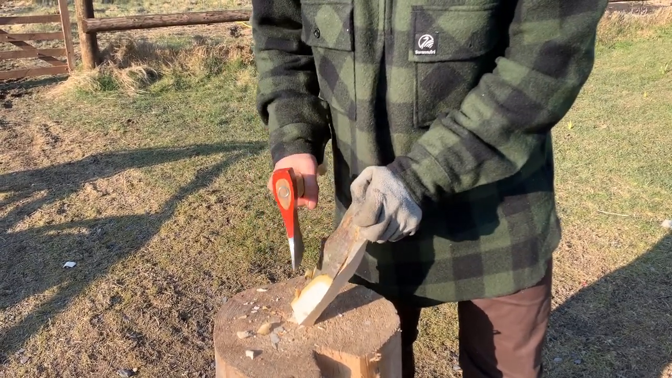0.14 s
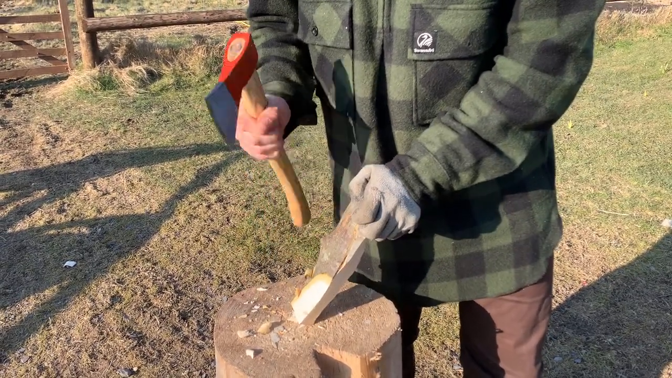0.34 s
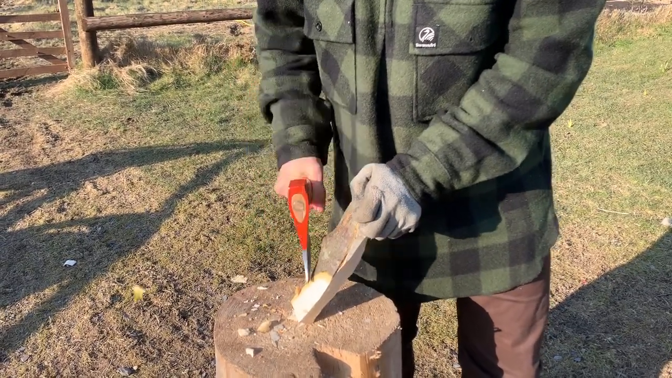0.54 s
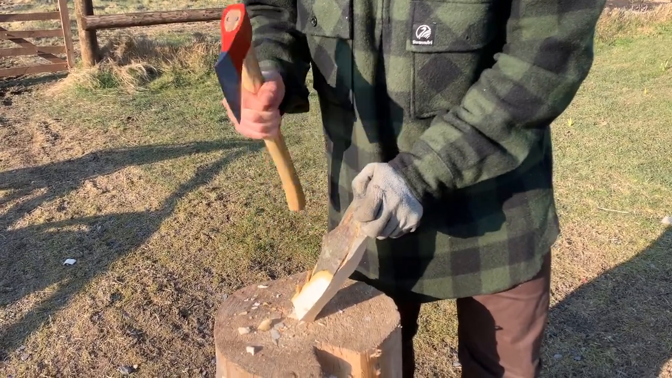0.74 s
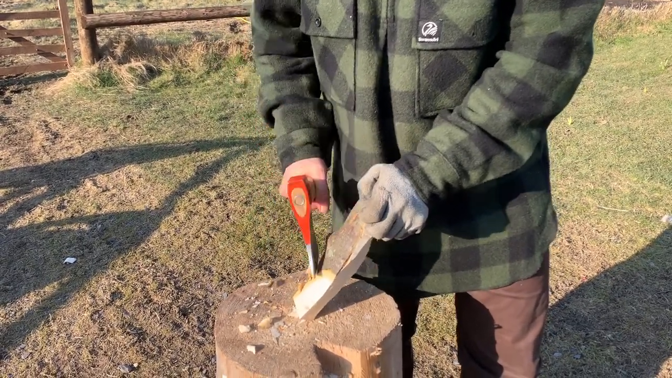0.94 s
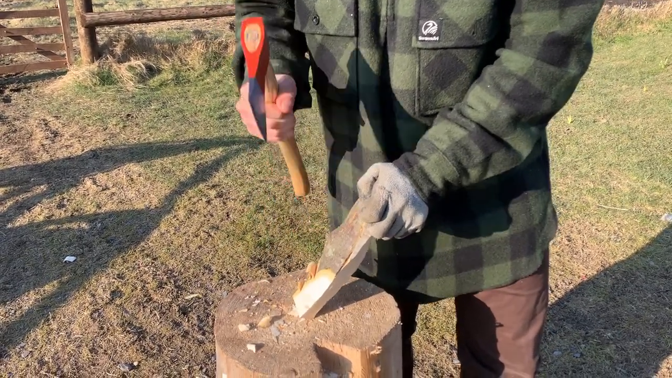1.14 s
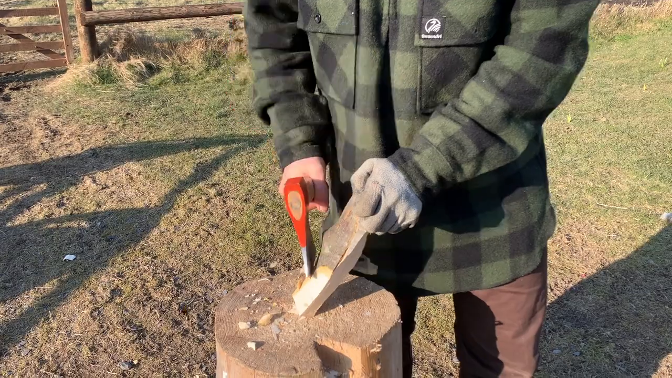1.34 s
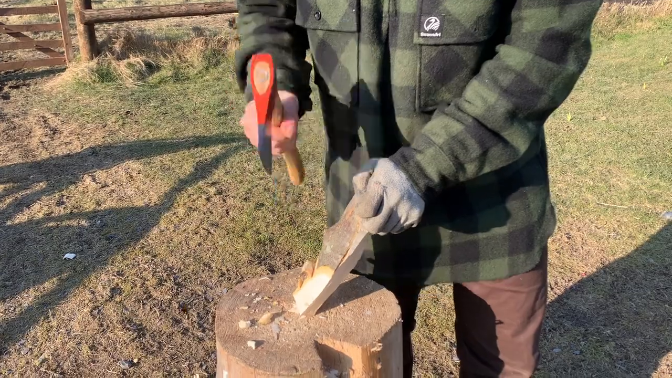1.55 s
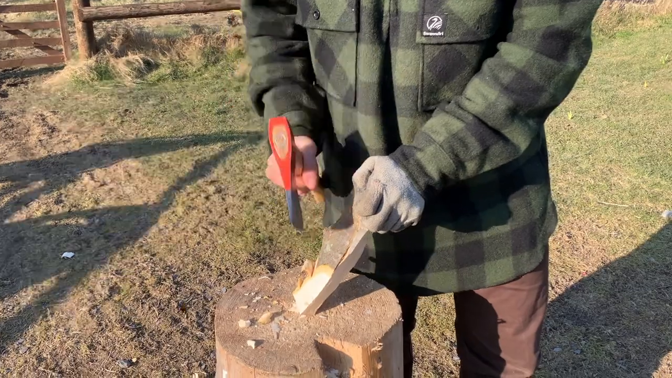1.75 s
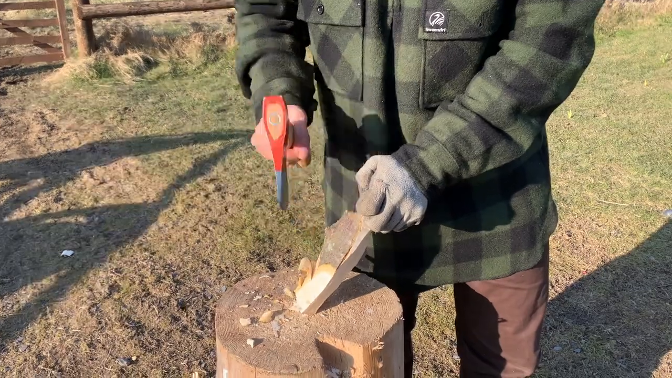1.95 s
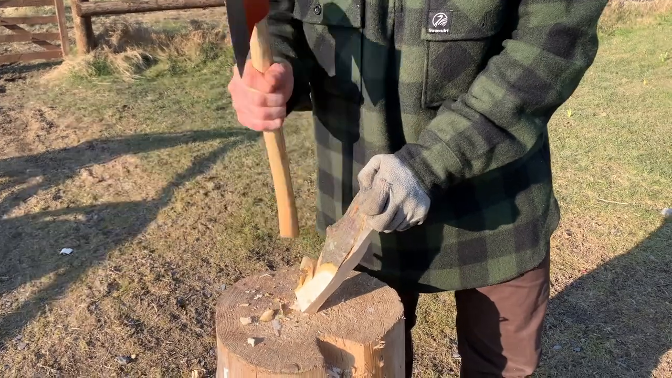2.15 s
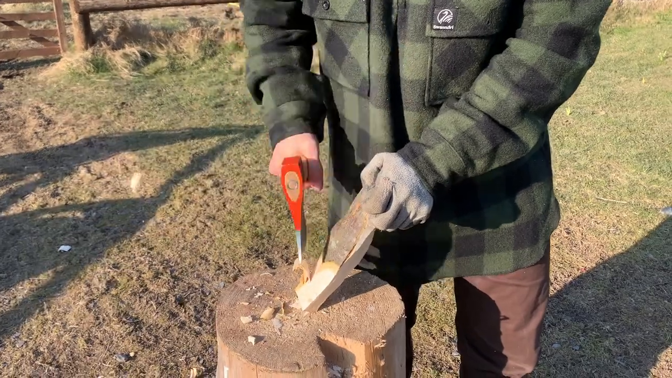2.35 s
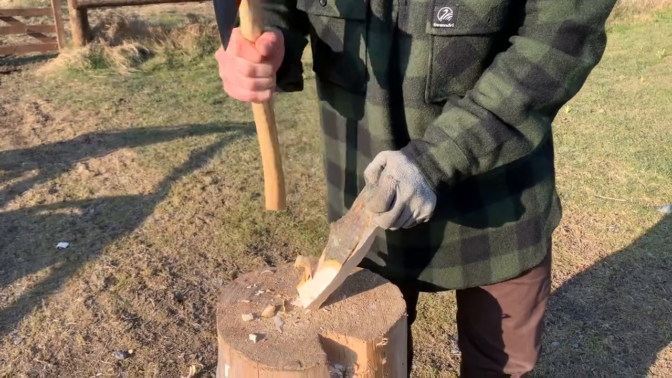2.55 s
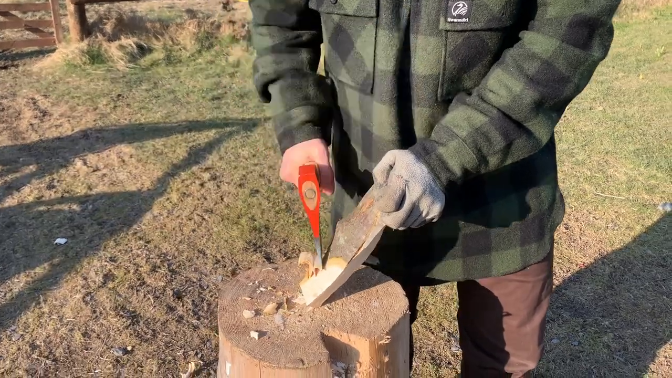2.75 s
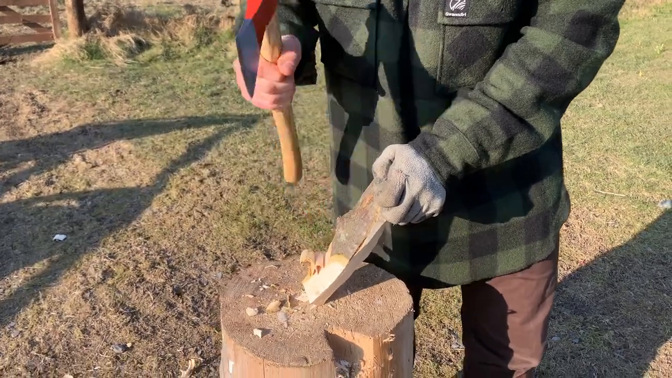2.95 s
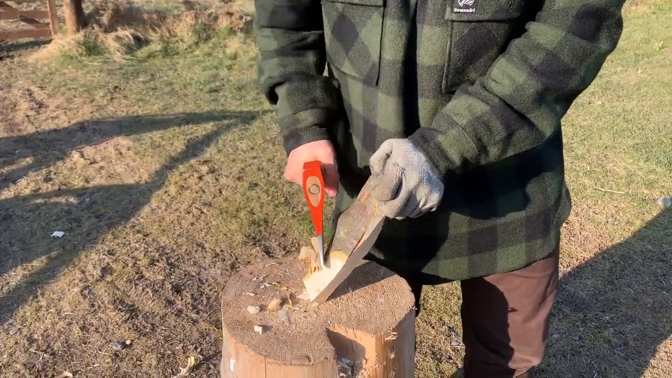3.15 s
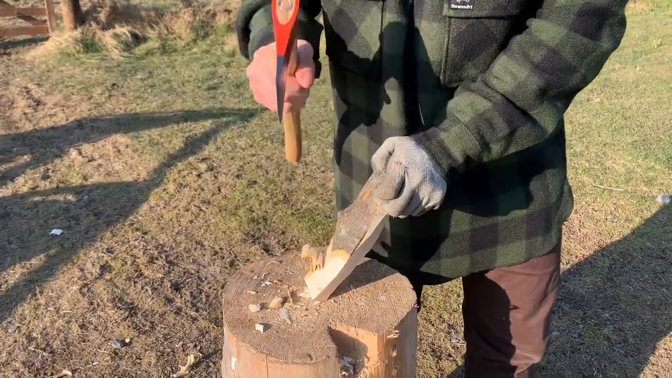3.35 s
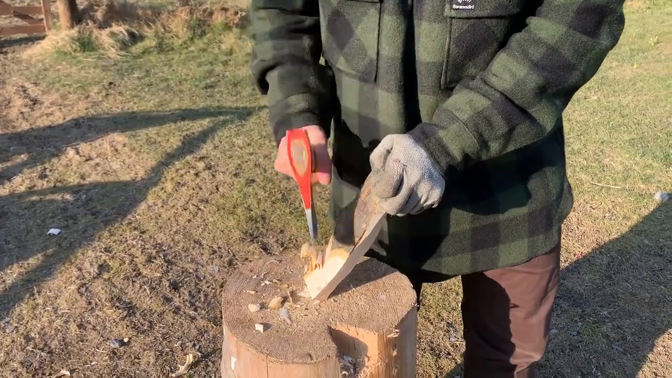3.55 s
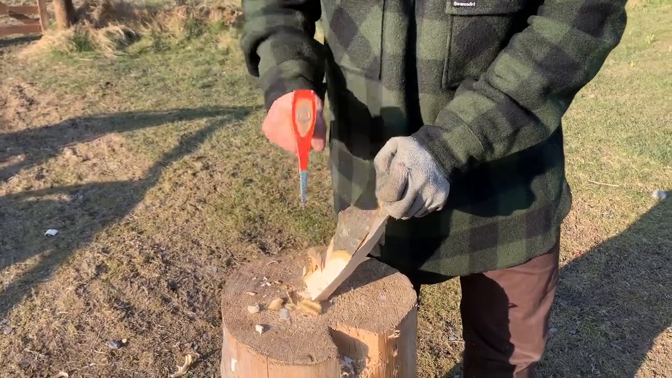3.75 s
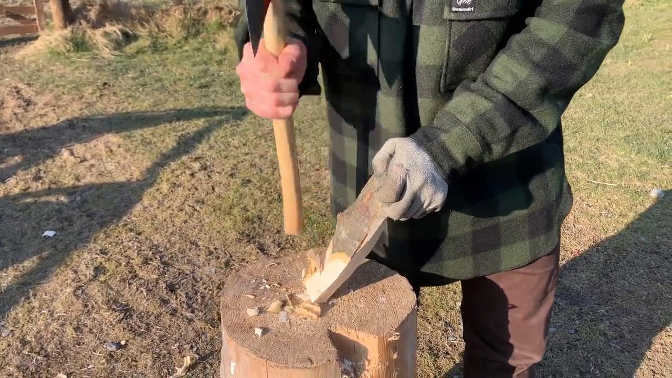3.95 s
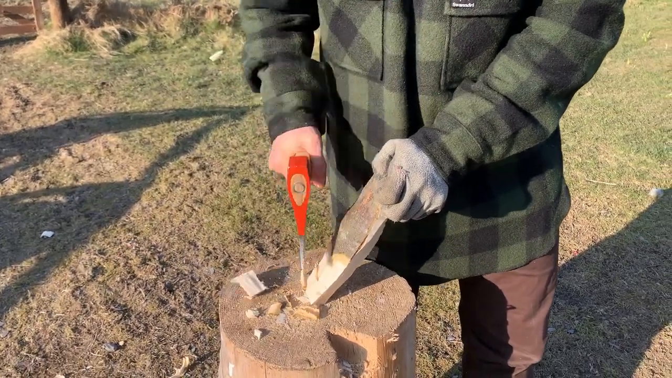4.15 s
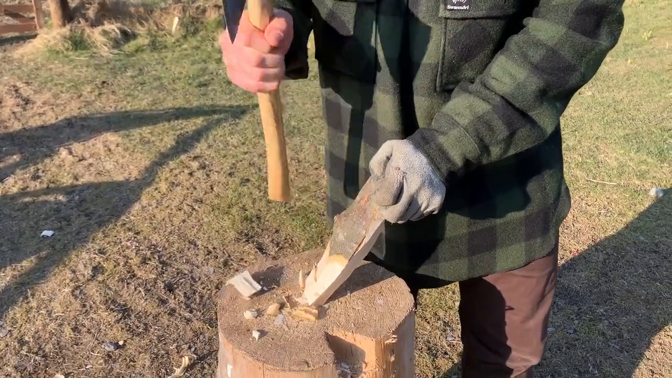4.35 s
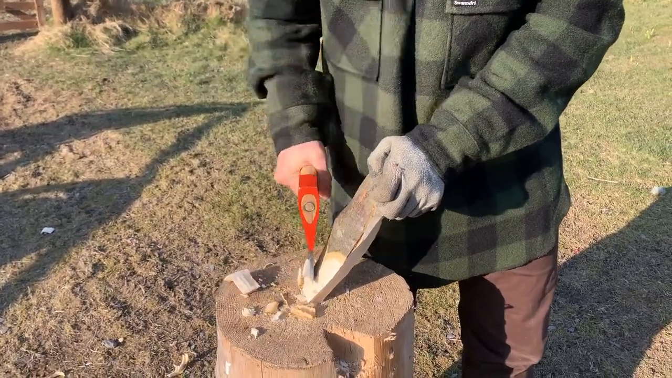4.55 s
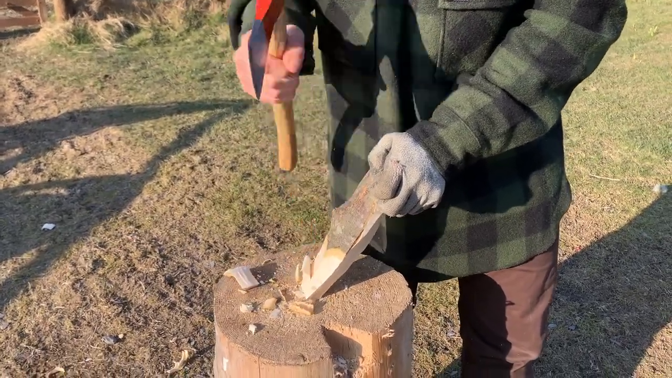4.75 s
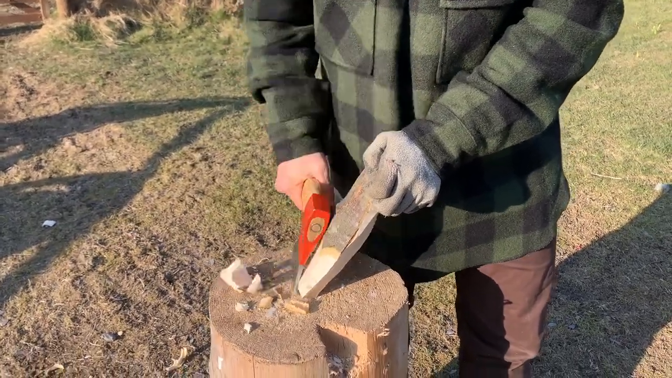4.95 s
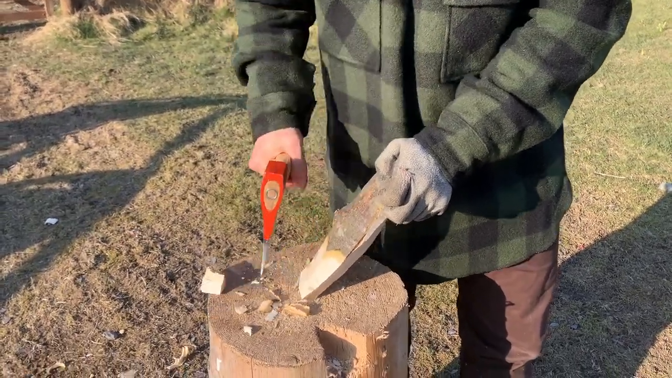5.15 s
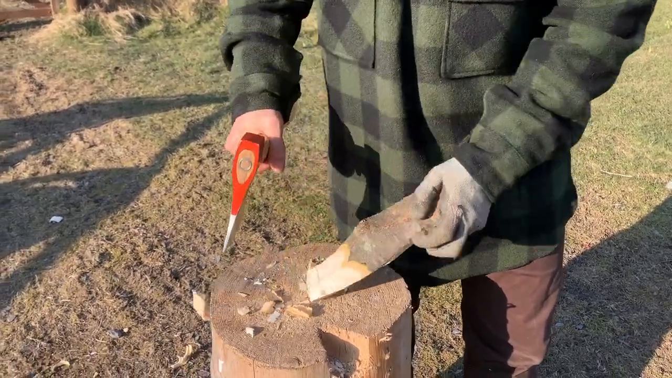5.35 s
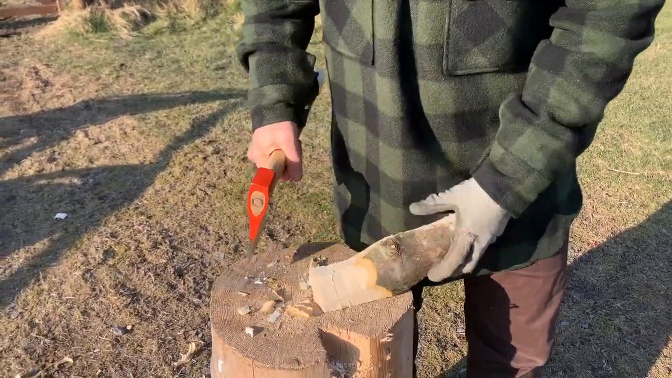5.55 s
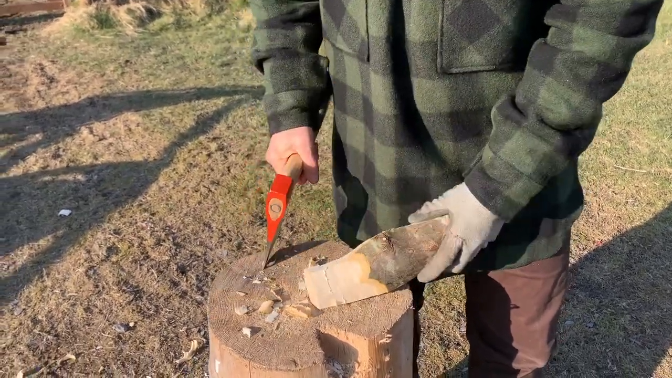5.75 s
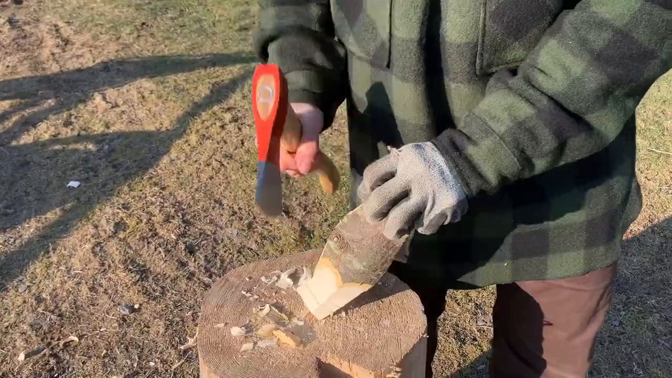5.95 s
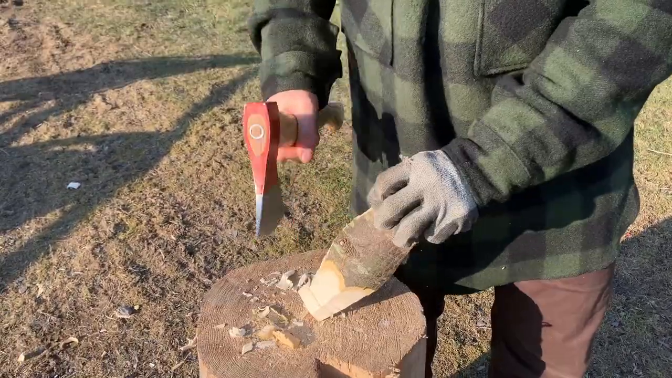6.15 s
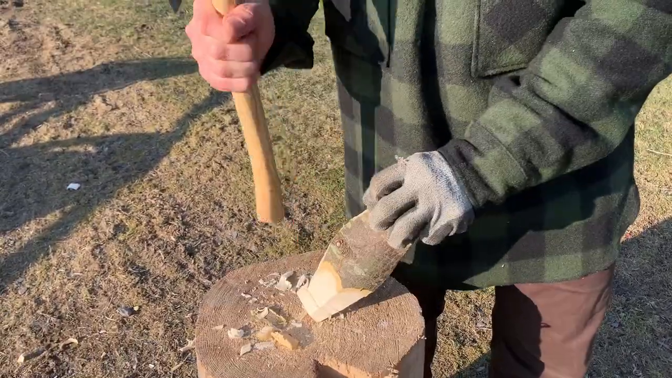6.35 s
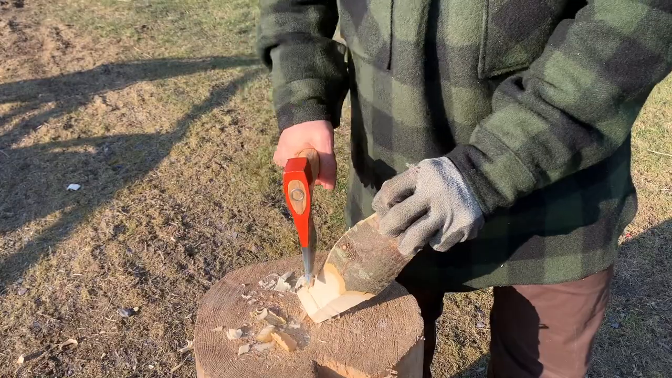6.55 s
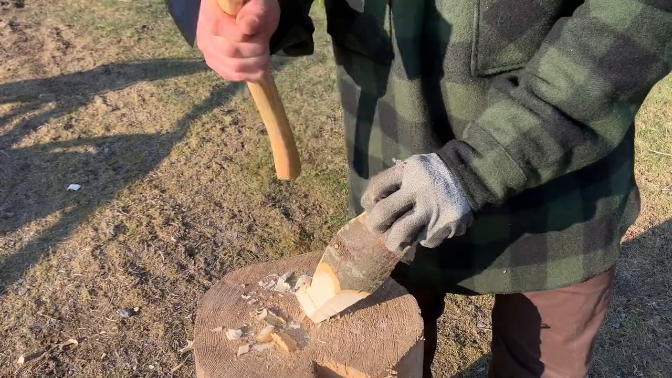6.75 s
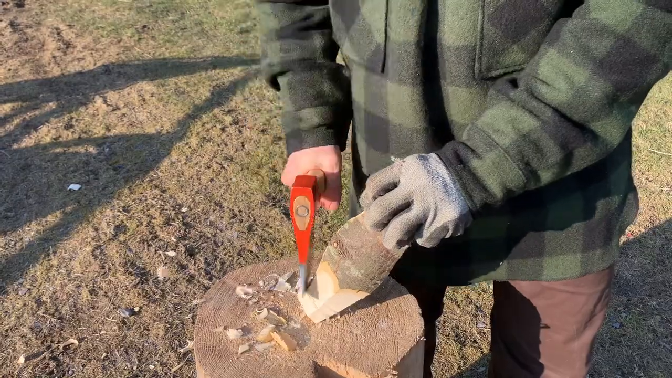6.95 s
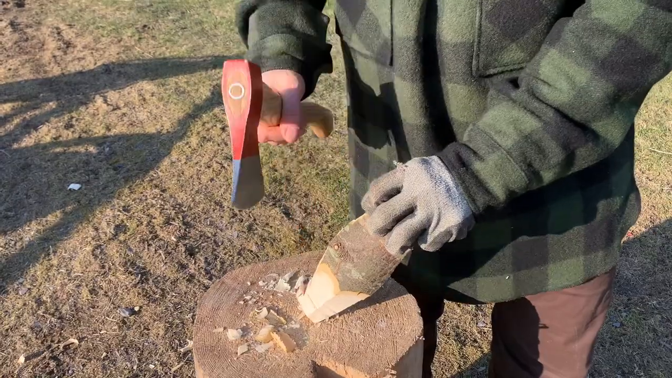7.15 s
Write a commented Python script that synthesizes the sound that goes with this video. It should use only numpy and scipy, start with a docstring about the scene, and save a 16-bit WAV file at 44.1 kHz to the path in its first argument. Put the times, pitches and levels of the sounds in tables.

```python
"""Wind rumbles, flutters and pops on the microphone over faint far air and a worker's rustle: shaped noise and pushes.
From 0.07 s a hatchet chops a split log fifteen times: uneven snaps ring wood, fibres and steel, then the block thumps.
Ground, a fence and a far wall return faint, smeared echoes; from 3.3 s small touches of chips tick in between.
After the twelfth blow the log is turned: a thin gliding tone squeaks, and the log settles with low knocks.
The wind rumble drops abruptly before the last three blows and rises again at the end."""
import sys
import numpy as np
from scipy import signal
from scipy.fft import rfft, irfft
from scipy.io import wavfile
from scipy.ndimage import uniform_filter1d

SR = 44100
rng = np.random.default_rng(int(sys.argv[2]) if len(sys.argv) > 2 else 0)


def waveform_to_disk(signal):
    """Save audio, clipped to [-1, 1], as 16-bit WAV at the path in sys.argv[1]."""
    frames = np.transpose(np.atleast_2d(signal))
    scaled = np.clip(frames, -1, 1) * 32767
    samples = np.round(scaled).astype(np.int16)
    wavfile.write(sys.argv[1], SR, samples)


N = 317961

# The blows: bite t/s, pitched knock level/dB, hardest snap after the bite t/ms, cut length t/ms,
# wood level/dB, fibre crack level/dB, crack tilt/(dB per octave), edge hiss level/dB,
# push of the block after the bite t/ms, thump f/Hz, thump peak level/dB, low and high steel ring level/dB
BLOW_TABLE = [(0.0705, -27, 4.1, 12.1, -30, -26.5, 10, -29.5, 16.6, 264, -25.5, -85, -72.5),
              (0.4593, -27.5, 4.1, 12.2, -25, -24, 5.5, -18.5, 20.7, 335, -17, -87, -87),
              (0.9075, -31, 3.1, 12.5, -24.5, -22.5, 5, -23.5, 20.6, 216, -12.5, -83, -95),
              (1.3315, -17, 1.1, 4.23, -15, -9, 5.5, -19.5, 17.2, 213, -5, -88.5, -92.5),
              (1.769, -29.5, 6.8, 12.7, -17.5, -18, 2, -23.5, 19, 207.5, -7, -79.5, -89.5),
              (2.223, -27, 2.2, 12.2, -20, -13.5, 6, -23.5, 23.3, 152.5, -8, -80, -88.5),
              (2.672, -19.5, 2.1, 6.44, -21.5, -11.5, 0.5, -18.5, 5.6, 393.6, -16, -80, -97),
              (3.113, -20, 0.8, 2.03, -8, -5, 5.5, -29.5, 11.4, 337, -16.5, -86, -100.5),
              (3.567, -21.5, 0.8, 6, -11, -11.5, 3, -22.5, 10.7, 203.4, -4.5, -88, -84.5),
              (4.0221, -14.5, 1.8, 8.8, -9, -11, 5, -20, 10, 256, -2, -75, -84),
              (4.4766, -28, 1.1, 4.3, -19.5, -8.5, 5.5, -20, 6.6, 241, -9.5, -88.5, -98),
              (4.9337, -26.5, 1.8, 7.4, -18.5, -10.5, 6, -21.5, 25, 252.4, -8.5, -70, -93),
              (5.9961, -18.5, 2.6, 9.8, -24, -13.5, 7.5, -22.0, 17.8, 197.0, -14, -73.5, -86.5),
              (6.4704, -16.5, 4.5, 8.2, -25.5, -14, 2.5, -17, 20.6, 251, -18, -58, -72),
              (6.9512, -15, 5.2, 7.85, -20.5, -11, 7.5, -18.5, 9.2, 211.4, -14.5, -78, -86)]
# Ways the body of the log rings: f/Hz, relative level/dB, time to die by 60 dB t/s
WOOD_MODES = [(620, -20, .014), (850, -19, .014), (1290, -1, .014), (1550, -6, .009)]
# Ways the cracking fibres ring: f/Hz, relative level/dB, time to die by 60 dB t/s
FIBRE_MODES = [(1960, 0, .008), (2250, -3, .007), (2750, -7, .006), (3060, -2, .009), (4050, -4, .005),
               (4700, -7, .004), (5530, -5, .005), (6450, -3, .004)]
# Ways the hissing edge rings: f/Hz, relative level/dB, time to die by 60 dB t/s
EDGE_MODES = [(8260, 1.5, 0.0038), (8980, -1.5, 0.0099), (9780, 3.5, 0.0071), (13100, -21, 0.0018),
              (14400, -31, .003)]
# The pitched knock and its after-ring: f/Hz, relative level/dB, time to die by 60 dB t/s
KNOCK_MODES = [(1140, 0, .028), (1135, -21, .1)]


def amp(db):
    """Turns decibels into gain."""
    return 10 ** (np.asarray(db) / 20)


def evened(x):
    """Scales to an average (rms) strength of 1."""
    return x / np.sqrt(np.mean(x ** 2) + 1e-20)


def read(points, hz):
    """Reads a table by frequency, with straight lines on a log-frequency axis."""
    f, value = np.transpose(points)
    return np.interp(np.log(hz + 1), np.log(f + 1), value)


def curve(rows):
    """Turns the columns of a time table into one value a sample."""
    s, *columns = np.transpose(rows)
    return [np.interp(np.arange(N) / SR, s, c) for c in columns]


def add(mix, s, sound):
    """Mixes a sound in at s seconds."""
    part = mix[round(s * SR):][:len(sound)]
    part += sound[:len(part)]


def coloured(spectrum, same):
    """Stereo noise of a given spectrum and rms 1; same says how alike the channels are."""
    a, b = rng.standard_normal((2, N))
    same = np.clip(same, 0, 1)
    z = rfft([a, same * a + np.sqrt(1 - same ** 2) * b])
    return evened(irfft(z * amp(read(spectrum, np.fft.rfftfreq(N, 1 / SR))), N))


def lumps(hz):
    """Slow random wandering of rms 1, fading out above hz."""
    z = rfft(rng.standard_normal(N))
    return evened(irfft(z / (1 + (np.fft.rfftfreq(N, 1 / SR) / hz) ** 2), N))


def thump(hz, t60, rise=0.0029, glide=0.91):
    """A quickly dying push whose pitch sinks from (.6 + glide) to .6 times hz; envelope peak 1."""
    t = np.arange(round(.12 * SR)) / SR
    turns = np.cumsum(hz * (.6 + glide * np.exp(-t / 0.0067))) / SR
    shape = (1 - np.exp(-(t / rise) ** 2)) * amp(-60 * t / t60)
    return -np.sin(2 * np.pi * turns) * shape / shape.max()


def wind_rumble(rumble_db):
    """Deep noise whose level wanders and leans now to one port, now to the other."""
    # Spectrum of the rumble: f/Hz, relative level per Hz/dB
    rumble_spectrum = [(12, -45), (20, -15.5), (39, -4.5), (64, 0), (102, -10.5), (193, -37), (230, -43),
                       (300, -73), (510, -120)]
    lean = amp(3.5 * lumps(5.0) * np.array([[.5], [-.5]]))
    return amp(rumble_db + 1.4 * lumps(10)) * coloured(rumble_spectrum, 1.0) * lean


def wind_flutter(flutter_db):
    """Small eddies burst on the ports as random short pushes in three sizes."""
    flutter = np.zeros((2, N))
    for hz in (150, 210, 300):
        size = amp(2.4 * np.minimum(rng.exponential(1, N), 4))
        bursts = size * (rng.random(N) < 25 / SR) * rng.choice([-1, 1], N)  # about 25 a second
        lean = amp(1.0 * rng.standard_normal((2, N)))
        push = thump(hz, 18.0 / hz, rise=2.1 / hz)
        flutter += signal.oaconvolve(bursts * lean, push[None])[:, :N] * 150 / hz
    return amp(flutter_db) * evened(flutter)


def wind_pops(rumble_db, flutter_db):
    """Gusts push on the ports: a low pop with a sharper front, leaning to one port or the other."""
    # The larger pops: t/s, peak level/dB, f/Hz, sharp front peak level/dB
    large_pops = [(0.192, -32.5, 87, -70), (0.236, -26, 74.5, -73), (0.351, -30.5, 107, -66),
                  (0.597, -24.5, 73, -50), (0.646, -35.5, 98.6, -34.5), (0.756, -30, 103.2, -51),
                  (1.196, -27, 106, -52), (3.687, -27.5, 116.5, -62.5), (3.83, -17.5, 107, -64.5),
                  (3.871, -19, 78.5, -57.5), (3.925, -24.5, 76, -41), (3.94, -21, 118.8, -36),
                  (3.98, -18.5, 82.6, -57), (4.186, -23.5, 132.5, -63), (4.2, -24, 97.8, -46),
                  (4.223, -27, 72.7, -42), (4.253, -20.5, 90, -44), (4.313, -27, 105.3, -57),
                  (4.664, -20.5, 74.6, -74), (5.25, -31, 75.2, -65.5)]
    count, over_rumble_db, over_flutter_db = 40, 3, -8.5  # random lesser pops follow the wind's level
    small_pops = [(at / SR, rumble_db[at] + over_rumble_db, hz, flutter_db[at] + over_flutter_db)
                  for at, hz in zip(rng.integers(200, N, size=count), rng.uniform(68, 120, size=count))]
    pops = np.zeros((N, 2))
    for s, db, hz, front_db in large_pops + small_pops:
        lean = amp(5.5 * rng.standard_normal() * np.array([.5, -.5]))
        sign = rng.choice([-1, 1]) * lean
        body = thump(hz, 8.6 / hz, rise=0.39 / hz, glide=.9)
        front = thump(330, 0.022, rise=0.006, glide=.3)
        add(pops, s - .003, sign * amp(db) * body[:, None])
        add(pops, s - .002, sign * amp(front_db) * front[:, None])
    return pops.T


def wind():
    """Moving air buffets the microphone as rumble, flutter and pops."""
    # The wind over time: t/s, rumble level/dB, flutter level/dB
    wind_levels = [(0.0, -40.5, -31.5), (0.15, -34.5, -49.5), (0.33, -44, -44.5), (0.64, -41.5, -40),
                   (0.82, -43.5, -56.5), (1.02, -66.5, -59), (1.27, -34.5, -60), (1.47, -64, -72.5),
                   (1.91, -44.5, -70), (2.42, -52, -81.5), (2.85, -46.5, -67), (2.97, -35, -62),
                   (3.35, -55, -64.5), (3.54, -48.5, -74), (3.7, -36.5, -46.5), (3.92, -26.5, -35),
                   (4.25, -34.5, -36), (4.4, -31.5, -58), (4.93, -39, -47), (5.08, -56.5, -54),
                   (5.28, -31.5, -60.5), (5.47, -55.5, -74), (5.68, -46, -35.5), (5.92, -40, -76),
                   (5.925, -74, -65), (6.38, -77.5, -73), (6.9, -56.5, -77), (7.1, -65, -57.5),
                   (7.21, -31.5, -79.5)]
    rumble_db, flutter_db = curve(wind_levels)
    return wind_rumble(rumble_db) + wind_flutter(flutter_db) + wind_pops(rumble_db, flutter_db)


def far_air():
    """Steady noise from far off, only partly alike in the two channels."""
    # Spectrum of the far air: f/Hz, relative level per Hz/dB
    air_spectrum = [(180, -31.5), (300, -1.5), (1310, -3.5), (5370, -22), (7130, -29), (8300, -20),
                    (9650, -11.5), (10700, -20), (11600, -39), (13700, -15.5), (16500, -43.5)]
    return amp(-83) * coloured(air_spectrum, 0.25)


def stirring():
    """Gain of the dull and bright rustle: rest, a swell after each blow, and larger movements."""
    # Larger movements: middle t/s, rise t/s, fall t/s, dull level/dB, bright level/dB
    moves = [(1.25, .15, .15, -78, -93), (3.202, .3, .2, -71.5, -92.5), (4.449, .2, .1, -76, -90),
             (5.4, 0.082, 0.14, -71.5, -72.5), (5.62, 0.082, 0.13, -71, -74.5)]
    rest_db = [[-92], [-91]]  # dull, bright
    jolt_db = np.array([-76.5, -84.5])  # dull, bright, over the energy of the crack
    rise_s, fall_s = .1, .2  # of each jolt to glove, bark and chips
    t, power = np.arange(N) / SR, amp(rest_db) ** 2
    jolts = []
    for s, _, _, ms, _, crack_db, *_ in BLOW_TABLE:
        energy_db = crack_db + 10 * np.log10(ms)
        jolts.append((s + rise_s, rise_s, fall_s, *(energy_db + jolt_db)))
    for s, rise, fall, *db in moves + jolts:
        swell = np.exp(-2 * ((t - s) / np.where(t < s, rise, fall)) ** 2)
        power = power + amp(db)[:, None] ** 2 * swell
    return np.sqrt(power)


def rustle():
    """The worker's rustle: flickering noise in a dull and a bright part that swell with movement."""
    # Spectrum of the rustle: f/Hz, relative level per Hz/dB
    cloth_spectrum = [(290, -33.5), (500, -4), (980, -10), (1120, -12.5), (2040, -9.5), (2850, -11.5),
                      (8670, -16.5), (10600, -21), (11400, -36.5), (14700, -19), (16500, -40)]
    flicker_db = 2.4 * lumps(25) + 1.8 * lumps(300)
    cloth = coloured(cloth_spectrum, 0.78)
    dull = signal.sosfiltfilt(signal.butter(3, 4500, fs=SR, output="sos"), cloth)
    dull_gain, bright_gain = stirring()
    return amp(flicker_db) * (dull_gain * evened(dull) + bright_gain * evened(cloth - dull))


def snaps(ms, first=0.94, hardest_ms=0., width_ms=0.94):
    """Force of a cut: the edge grazes bark for 3 ms, bites, then fibres snap unevenly, one hardest."""
    draw, t = rng.standard_normal((2, 1600)), np.arange(1600) / SR * 1000 - 3  # t in ms from the bite
    bite = amp(-19.0) * np.exp(np.minimum(t, 0) / 18.0) + np.clip(t / 0.99, 0, 1)
    hardest = 1 + first * np.exp(-abs(t - hardest_ms) / width_ms)
    strength = bite * hardest / (1 + (abs(t) / ms) ** 3.2)
    uneven_db = 4.5 * evened(uniform_filter1d(draw[1], 25))
    return draw[0] * amp(uneven_db) * strength


def varied(modes, bright_db=0, detune=.03, scatter_db=2.5):
    """Every spot and grip shifts the modes a little; bright_db tilts them per octave."""
    draw = rng.standard_normal((len(modes), 2))
    return [(f * (1 + detune * a), db + scatter_db * b + bright_db * np.log2(f / 3500), t60)
            for (f, db, t60), (a, b) in zip(modes, draw)]


def ring(modes, drive):
    """Lets a force set off a dying sine for each mode."""
    t = np.arange(4000) / SR
    response = sum(amp(db - 60 * t / t60) * np.sin(2 * np.pi * f * t) for f, db, t60 in modes)
    return signal.fftconvolve(drive, response)


def block_thump(out, s, hz, db):
    """The blow pushes through the log and block into the soil, which shudders slowly."""
    soil_db, soil_hz, soil_t60 = -24, 59, 0.19  # level is relative to the thump
    t = np.arange(SR // 2) / SR
    add(out, s - .007, amp(db) * thump(hz, .03))
    add(out, s, amp(db - 7.5) * thump(140, 0.013, rise=0.0041, glide=0.51))  # the block in the soil
    shudder = np.minimum(t / .012, 1) * np.sin(2 * np.pi * soil_hz * t)
    add(out, s, amp(db + soil_db - 60 * t / soil_t60) * shudder)


def steel_ring(out, s, levels_db):
    """The hatchet head rings with a beat, as close pairs do, until the grip damps it."""
    # Rings of the head: f/Hz, time to die by 60 dB before the grip damps it t/s, beat f/Hz
    steel = [(5500, 1.4, 17), (10000, .2, 30)]
    t = np.arange(SR // 2) / SR
    for (f, t60, split_hz), db in zip(steel, levels_db):
        beat = 1 + .3 * np.cos(2 * np.pi * (split_hz * t + rng.random()))
        held = 1 / (1 + (t / .33) ** 10)  # the grip takes over near .33 s
        decay = amp(db - 60 * (t - .08) / t60)  # level is the one 80 ms after the bite
        add(out, s, decay * beat * held * np.sin(2 * np.pi * f * t))


def blows():
    """Wood, fibres, edge and knock ring to each cut's force; thump and steel are added."""
    out = np.zeros(N)
    edge_share = 0.48  # the edge hisses for this share of the cut
    for (s, knock_db, hardest_ms, ms, wood_db, crack_db, bright_db, edge_db,
         late_ms, hz, thump_db, *steel_db) in BLOW_TABLE:
        force = snaps(ms, 0.53, hardest_ms, width_ms=2.2)
        after_ms = (np.arange(len(force)) / SR - .003) * 1000
        hiss = force / (1 + (after_ms / (edge_share * ms)) ** 4)
        parts = ((varied(WOOD_MODES, detune=.006, scatter_db=2.0), wood_db, force),
                 (varied(FIBRE_MODES, bright_db), crack_db, force),
                 (varied(EDGE_MODES, detune=0.022), edge_db, hiss),
                 (varied(KNOCK_MODES, detune=.004, scatter_db=1.0), knock_db, force))
        for modes, db, drive in parts:
            sound = ring(modes, drive)
            strength = np.sqrt((sound ** 2).sum() / (ms * SR / 1000))  # energy spread over the cut
            add(out, s - .003, amp(db) * sound / strength)
        block_thump(out, s + late_ms / 1000, hz, thump_db)
        steel_ring(out, s, steel_db)
    return out


def ports(x):
    """The two microphone openings hear a near source with their own phase and balance."""
    # Phase between the ports: f/Hz, left leads by phase/rad
    lead = [(0, 0), (2300, .6), (2800, 2), (5000, 1.7), (6200, 3.1), (9300, 0), (11400, -3), (16400, -9.7)]
    # Balance of the ports: f/Hz, left minus right level/dB
    tilt = [(60, -.3), (1500, .5), (3400, -2), (4300, -5), (5800, -3), (7000, 2), (8000, 0)]
    hz = np.fft.rfftfreq(N, 1 / SR)
    half = amp(read(tilt, hz) / 2) * np.exp(.5j * np.interp(hz, *np.transpose(lead)))
    return irfft(rfft(x) * np.array([half, 1 / half]), N)


def field(x):
    """Smeared echoes, and sparse scatter from ground and posts dying band by band."""
    # How fast the scatter dies: f/Hz, time to die by 60 dB t/s
    scatter_decay = [(150, .2), (500, .15), (1500, .17), (4000, .14), (10000, .17)]
    # How much scatter comes back: f/Hz, level/dB
    scatter_level = [(150, -26), (600, -30), (1500, -25), (5000, -26), (9000, -26.5), (14000, -23)]
    # Ground at the block, fence, wall and what lies behind it: delay t/s, level/dB, low-pass f/Hz, smear t/s
    echo_rows = [(.001, -15.5, 2574, 0.0019), (0.0327, -33, 12490, 0.0039), (0.124, -52, 3254, .008),
                 (.135, -58, 3340, 0.053)]
    taps = np.zeros((2, SR // 2))
    at = np.arange(300, SR // 2 - 20, 20) + rng.integers(0, 20, (2, (SR // 2 - 301) // 20))
    np.put_along_axis(taps, at, rng.choice([-1., 1.], at.shape), 1)
    taps[1] = .8 * taps[0] + .6 * taps[1]  # the channels are partly alike
    hz, t, z = signal.stft(taps, SR, nperseg=256)
    decay = amp(-60 * t / read(scatter_decay, hz)[:, None])
    tail = signal.istft(z * decay, SR, nperseg=256)[1]
    length = tail.shape[1]
    colour = amp(read(scatter_level, np.fft.rfftfreq(length, 1 / SR)))
    tail = irfft(rfft(tail / np.linalg.norm(tail[0])) * colour, length)
    for s, db, top_hz, smear_s in echo_rows:  # a rough surface spreads each echo in time
        smear = rng.standard_normal((2, 6000)) * np.exp(-np.arange(6000) / SR / smear_s)
        smear = signal.sosfilt(signal.butter(3, (450, top_hz), "band", fs=SR, output="sos"), smear)
        for ear in (0, 1):
            add(tail[ear], s, amp(db) * smear[ear] / np.linalg.norm(smear[ear]))
    return signal.fftconvolve(x[None], tail, axes=1)[:, :N]


def ticks():
    """Chips and small contacts touch the same wood and steel with short forces."""
    # The touches: t/s, crack peak level/dB, crack tilt/(dB per octave), edge peak level/dB,
    # wood peak level/dB, length t/ms
    touches = [(3.2954, -52, 3, -63, -70, 2.1), (3.3742, -39.5, 8, -66, -51.5, 3),
               (4.136, -53, 6, -50.5, -50, 1.55), (5.0914, -48, 5, -50.5, -84.5, 3.8),
               (5.3042, -54, 9, -60, -78, 1.1), (5.3623, -40.5, 29, -40.5, -81, 1.9),
               (5.417, -52, 10.5, -58, -78, 1.59), (5.4383, -52, 9, -58, -64, 1.6),
               (5.6316, -30, 6.5, -44, -35.5, 7), (5.65, -21.5, 21.5, -21.5, -43, 1.9),
               (5.691, -41, 8, -65, -49, 3.8), (5.7994, -55.5, 9, -62, -71, 5),
               (6.423, -32, 19, -28, -71.5, 1.3)]
    out = np.zeros(N)
    for s, crack_db, bright_db, edge_db, wood_db, ms in touches:
        force = snaps(ms, first=0.67)
        for modes, db in ((WOOD_MODES + KNOCK_MODES, wood_db),
                          (varied(FIBRE_MODES, bright_db), crack_db), (EDGE_MODES, edge_db)):
            sound = ring(modes, force)
            add(out, s - .004, amp(db) * sound / abs(sound).max())
    return out


def squeak():
    """One thin sine glides upward as the log turns."""
    # The squeak over time: t/s, f/Hz, level/dB
    glide_rows = [(5.43, 2020, -86.5), (5.462, 2053, -65), (5.528, 2125, -88), (5.54, 2200, -106)]
    hz, db = curve(glide_rows)
    t = np.arange(N) / SR
    on = (t > glide_rows[0][0]) & (t < glide_rows[-1][0])
    return on * np.sqrt(2) * amp(db) * np.sin(2 * np.pi * np.cumsum(hz) / SR)


def settling():
    """The turned log comes to rest on the block: low thumps, each with a hollow ring."""
    # The contacts: t/s, thump peak level/dB, thump f/Hz, hollow ring peak level/dB
    contacts = [(5.632, -18.5, 190.8, -21.5), (5.661, -15.5, 81.5, -49.5), (5.69, -29, 61.6, -38)]
    # Ring of the log lying loose: f/Hz, relative level/dB, time to die by 60 dB t/s
    hollow = [(463.5, 2.5, 0.097), (620, -2.5, 0.025)]
    out = np.zeros(N)
    for s, db, hz, hollow_db in contacts:
        add(out, s - .003, amp(db) * thump(hz, 8.8 / hz, rise=0.27 / hz, glide=1.0))
        sound = ring(hollow, np.hanning(60))
        add(out, s, amp(hollow_db) * sound / abs(sound).max())
    return out


def scene():
    """Wind and background, with the near work heard through the ports and as echoes."""
    background = wind() + far_air() + rustle() + squeak()
    work = blows() + ticks() + settling()
    return background + ports(work) + field(work)


def record(dry):
    """Housing colour, a wind filter under 45 Hz, a soft overload at high levels, and the band limit."""
    # Lifts and dips of the microphone housing: f/Hz, level/dB
    housing = [(6000, -1), (7200, 1.5), (8200, 3.5), (10600, 0), (11600, -9.5), (12600, 0)]
    x = irfft(rfft(dry) * amp(read(housing, np.fft.rfftfreq(N, 1 / SR))), N)
    x = signal.sosfilt(signal.butter(2, 45, "high", fs=SR, output="sos"), x)
    x = .97 * np.tanh(x / .97)
    low_pass = signal.firwin(255, 16300, window=("kaiser", 9), fs=SR)  # cutoff in Hz
    return signal.oaconvolve(x, low_pass[None], "same")


dry = scene()
out = record(dry)
waveform_to_disk(out)
```